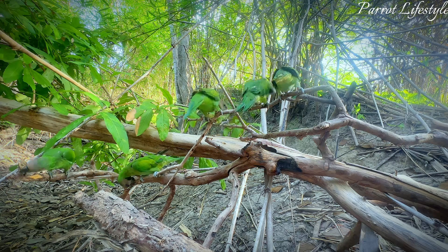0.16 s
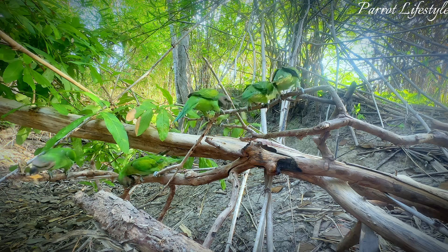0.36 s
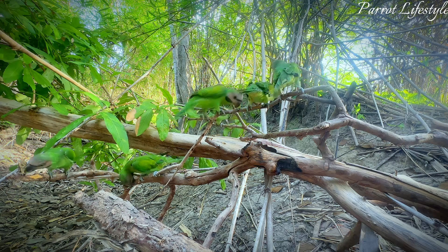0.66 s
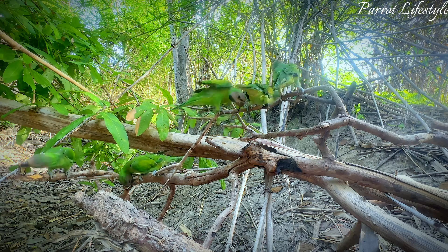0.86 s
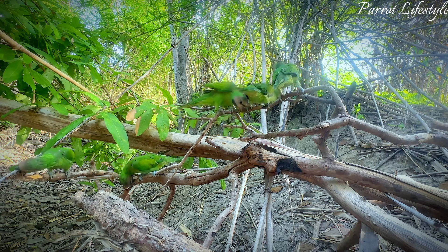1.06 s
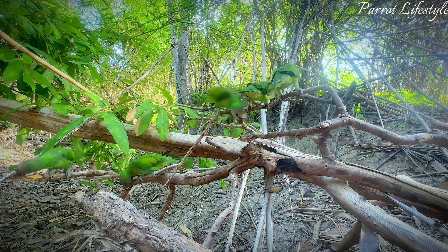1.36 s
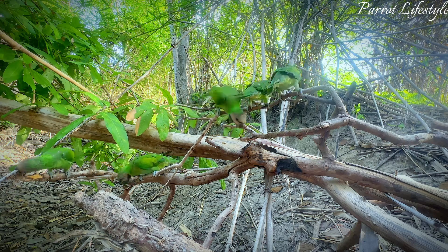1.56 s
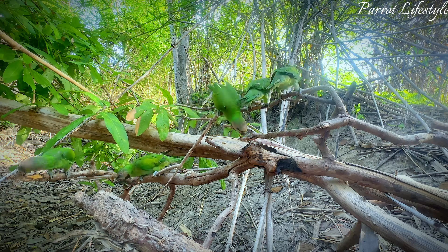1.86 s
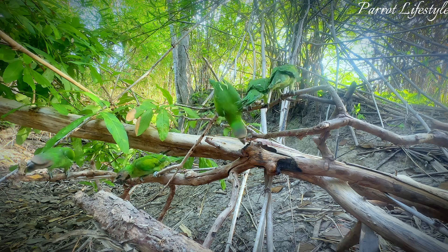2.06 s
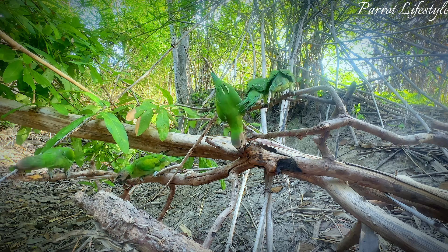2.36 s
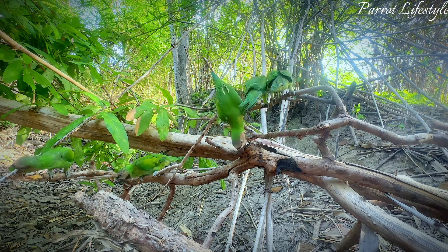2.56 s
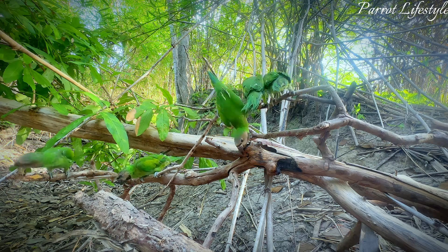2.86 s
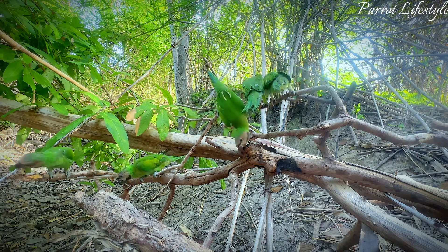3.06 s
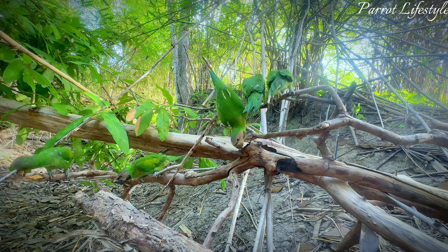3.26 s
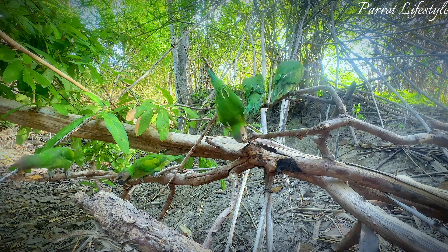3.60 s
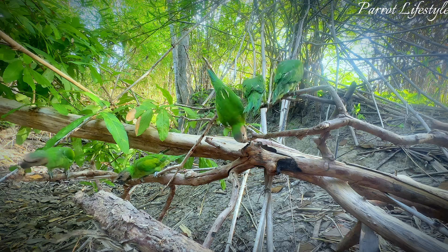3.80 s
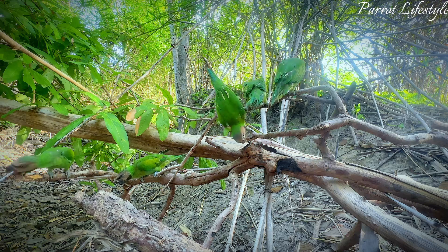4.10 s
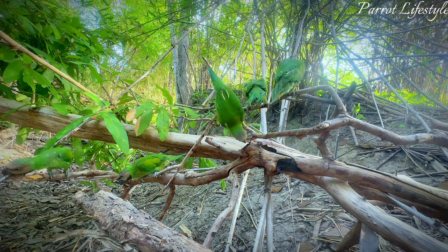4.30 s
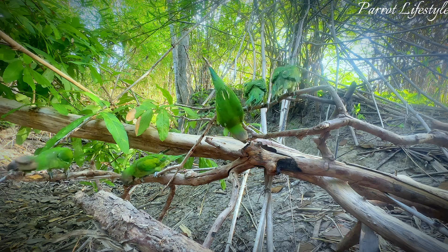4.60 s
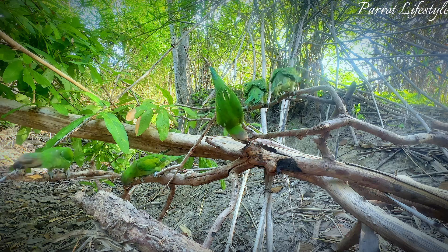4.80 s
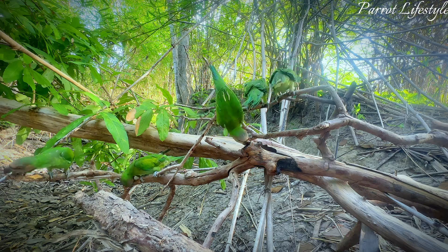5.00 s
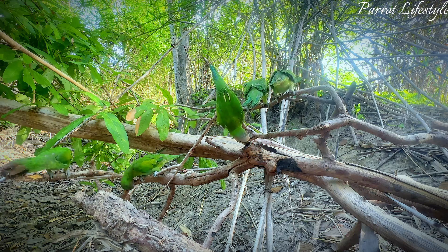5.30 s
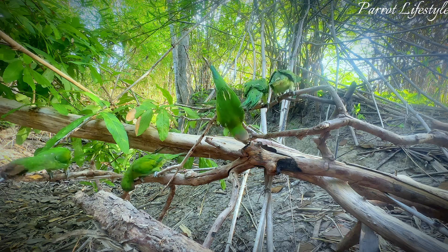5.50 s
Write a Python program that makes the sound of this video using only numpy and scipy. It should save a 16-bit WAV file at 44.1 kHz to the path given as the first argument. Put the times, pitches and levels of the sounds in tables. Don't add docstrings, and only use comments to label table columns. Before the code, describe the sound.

Small parrots tap and scratch on dry branches in a thicket, over a steady high cricket trill and a faint low rumble.

```python
import sys
import numpy as np
from scipy import signal
from scipy.io import wavfile
from scipy.ndimage import uniform_filter1d

SR = 44100
rng = np.random.default_rng(int(sys.argv[2]) if len(sys.argv) > 2 else 0)


def unload_audio(sound):
    columns = np.transpose(np.atleast_2d(sound))
    steps = np.round(np.clip(columns, -1, 1) * 32767)
    wavfile.write(sys.argv[1], SR, steps.astype(np.int16))


def attenuation_scalar(level_db):
    decades = np.asarray(level_db, float) / 20
    return 10 ** decades


N = 249165

# (multiple of tooth rate, level [dB])
TEETH = [(4, -26.5), (6, -30), (7, -32.5), (8, -36), (10, -35)]


def evened(x):
    return x / np.sqrt(np.mean(x ** 2) + 1e-20)


def band(x, lo_hz, hi_hz):
    return signal.sosfilt(signal.butter(2, [lo_hz, hi_hz], "bandpass", fs=SR, output="sos"), x)


def ring(x, hz, width_hz):
    pole = np.exp((2j * np.pi * hz - np.pi * width_hz) / SR)
    return 2 * signal.lfilter([1 - abs(pole)], [1, -pole], x).real


def track(events, sound):
    mix = np.zeros(N)
    for s, *row in events:
        part = mix[round(s * SR):]
        made = sound(*row)[:len(part)]
        part[:len(made)] += made
    return mix


def thicket(x, t60_s, wet_db):
    t = np.arange(SR // 4) / SR
    tail = rng.standard_normal(len(t)) * attenuation_scalar(-60 * t / t60_s) * (t > .003)
    return x + attenuation_scalar(wet_db) * signal.oaconvolve(x, tail / np.linalg.norm(tail))[:N]


def hush():
    # (frequency [Hz], level per Hz [dB])
    colour = [(40, -3.5), (70, 7.5), (150, -2), (850, -13), (2800, -13.5), (5000, -14), (6300, -21),
              (7000, -21.5), (8000, -74), (9600, -36), (10250, -15), (11000, -42.5), (13500, -27),
              (15000, -25)]
    frames, hz = N // 256 + 5, np.fft.rfftfreq(1024, 1 / SR)
    a, b, patches = rng.standard_normal((frames, 513, 3)).T
    patches = uniform_filter1d(patches, size=10, axis=0)
    patches = evened(uniform_filter1d(patches, size=8, axis=1))
    colour_hz, level_db = np.transpose(colour)
    colour_db = np.interp(np.log(hz + 1), np.log(colour_hz), level_db)
    patchy_db = 0.38 + 2.0 / (1 + (hz / 500) ** 2)
    z = (a + 1j * b) * attenuation_scalar(colour_db[:, None] + patchy_db[:, None] * patches)
    return attenuation_scalar(-55.5) * evened(signal.istft(z, nperseg=1024, noverlap=768)[1][:N])


def cricket(hz, db, turns, share, rise_hz, side_db, teeth=TEETH, uneven_db=0.5, uneven_hz=2.785):
    turns = turns + 1.5
    start, loud, pitch = rng.standard_normal((100, 3))[turns.astype(int)].T
    place = np.clip((turns % 1 - .5) / np.clip(share, .1, 1), -.5, .5)
    swell = np.cos(np.pi * place) ** 1.1 * attenuation_scalar(uneven_db * loud)
    swell *= 1 + .1 * evened(uniform_filter1d(rng.standard_normal(N), size=150))
    pitch_hz = hz + 2 * rise_hz * place + uneven_hz * pitch
    phase = 2 * np.pi * np.cumsum(pitch_hz) / SR + 9 * start
    sides = sum(attenuation_scalar(tooth_db + side_db) * np.sin(k * phase / 5) for k, tooth_db in teeth)
    return attenuation_scalar(db) * evened(swell) * np.sqrt(2) * (np.sin(phase) + sides)


def singer(t, row, pace):
    hz, hz_per_s, db, db_per_s, rate_hz = row
    lag, lag_per_s, sway, period_s, late_s = pace
    swayed = sway * np.cos(2 * np.pi * (t - late_s) / period_s)
    turns = rate_hz * t - lag - lag_per_s * t - swayed
    return hz + hz_per_s * t, db + db_per_s * t, turns


def near_crickets():
    # (wing pitch [Hz], pitch drift [Hz/s], level [dB], level drift [dB/s], stroke rate [1/s])
    singers = [(7177, -.3, -50.2, -.33, 14.46), (7275.5, -.25, -54, .3, 14.42),
               (7382, -1.7, -47.7, .13, 12.98), (7537, -2.8, -51.5, -.04, 12.96),
               (7290, -.7, -62, 0, 14.45)]
    # (mean lag [turns], lag drift [turns/s], sway [turns], sway period [s], latest at [s])
    paces = [(.19, 0, .07, 3.6, 2.1), (-.37, .005, .08, 1.9, 2.0), (-.25, .014, .045, 3, 2.4),
             (.25, 0, .06, 2.9, 2.5), (.5, -.03, .06, 4.5, 1.8)]
    # (sounding share of turn, pitch rise in a stroke [Hz], trim [dB], side tones [dB])
    wings = [(0.99, 14, 1, 2), (0.27, 5.5, -5, 7.5), (0.64, 24.5, -0.34, -31), (0.58, 23, -1.5, -23)]
    # (multiple of tooth rate, level [dB])
    reedy_teeth = [(4, -7.5), (6, -28), (7, -9.5), (8, -27.5), (10, -19)]
    t, mix = np.arange(N) / SR, 0
    for row, pace, (share, rise_hz, trim_db, side_db) in zip(singers, paces, wings):
        mix += attenuation_scalar(trim_db) * cricket(*singer(t, row, pace), share, rise_hz, side_db)
    mix += attenuation_scalar(-5.0) * cricket(*singer(t, singers[-1], paces[-1]), 0.45, 2.5, 0, reedy_teeth)
    return thicket(mix, .1, -15)


def far_crickets():
    # (pitch [Hz], stroke rate [1/s])
    voices = [(7110, 13.5), (7150, 12.4), (7232, 11.9), (7252, 14.1), (7275, 13.2), (7310, 13.7),
              (7415, 13.05), (7440, 12.5), (7485, 14.7), (7505, 13.9), (7590, 13.3)]
    voices_db = [-92, -61, -63, -58, -57.5, -57, -62.5, -62, -67, -57.5, -89]
    t, mix = np.arange(N) / SR, 0
    for (hz, rate_hz), db in zip(voices, voices_db):
        mix += cricket(hz + 0 * t, db, rate_hz * t, .9, 6, 1.5, uneven_db=2.5, uneven_hz=6)
    return mix


def tap(db, hz, body_db, treble_db, split_db):
    t = np.arange(2000) / SR
    rattle = rng.standard_normal(len(t)) * attenuation_scalar(-60 * t / .009) * np.minimum(t / .0004, 1)
    rattle[8] += 4.5
    width_hz = .06 * hz + 120
    wood = rattle + attenuation_scalar(13) * ring(rattle, hz, width_hz) + attenuation_scalar(2) * ring(rattle, .79 * hz, width_hz)
    edge_hz = np.clip(.72 * hz, 2400, 3600)
    crack = rattle * attenuation_scalar(-60 * t / .02)
    body = -band(wood if hz < edge_hz else rattle, min(.6 * hz, 1300), edge_hz)
    middle = band(band(wood, edge_hz, 5900), edge_hz - 1800, 6200)
    treble = band(band(crack, 7000, 11500), 6000, 13000)
    air = band(crack, 12000, 16500)
    treble_split_db, air_split_db = split_db
    parts = [(body_db, body), (0, middle), (treble_db + treble_split_db, treble), (treble_db + air_split_db, air)]
    return attenuation_scalar(db) * sum(attenuation_scalar(part_db) * part / abs(part).max() for part_db, part in parts)


def beak_pecks():
    # (time [s], level [dB], ring [Hz], body [dB], treble [dB])
    pecks = [(.491, -42.5, 915, -5, -5), (.553, -54, 1540, 10, -5), (1.0189, -37.5, 4740, -5, -5),
             (1.9173, -47.5, 5190, -1, -4), (2.046, -44, 4130, -21, 10), (2.599, -47, 5070, -20, 7),
             (3.0365, -48, 5150, -15, 1), (3.0659, -39.5, 3770, -28, 2), (3.1322, -27, 5100, -10, 2.5),
             (3.1455, -27, 5040, -9.5, -3), (3.3603, -37.5, 4970, -6, 7.5), (4.2995, -43, 4070, -17, 0),
             (4.9248, -22.5, 2560, -33, -11.5), (5.067, -38, 5160, -5.5, -7), (5.1954, -30, 5040, -23, 0),
             (5.3773, -25.5, 3860, -7, -13), (5.45, -53, 5080, -5, 8.5)]
    return track(pecks, lambda *row: tap(*row, split_db=(0.1, -9)))


def footfalls():
    # (time [s], level [dB], ring [Hz], body [dB], treble [dB])
    landings = [(.833, -31, 4880, -0.5, 1), (.9722, -49, 2430, 1, 5), (.9906, -29, 1910, -4, 0),
                (.993, -51, 900, 12, -20), (1.3335, -60.5, 972, 10, -14), (1.3738, -40, 1670, -23, -22),
                (1.496, -38.5, 5000, -21, -29), (1.6701, -47, 5070, -10, -22),
                (2.2253, -49, 1960, -10, -19), (2.4389, -51, 5140, -6, -17), (2.7944, -58.5, 940, 13, -19),
                (3.1023, -41.5, 3800, -20, -1), (3.1419, -24, 4800, -39, -7), (3.3248, -42, 5300, -30, -6),
                (4.1629, -33, 4480, -31, -30), (4.165, -55, 1110, 15, -25), (4.3062, -39.5, 4120, 0, -20),
                (4.3145, -43, 4100, -8, -20), (4.4082, -43.5, 1580, -7, -19), (5.2997, -40, 2930, -20, -22),
                (5.3532, -51, 2300, 7, -24), (5.3968, -33.5, 5100, -2.5, -30),
                (5.5273, -38, 4300, -30, -30)]
    return track(landings, lambda *row: tap(*row, split_db=(0.092, -0.1)))


def knock(db, first_hz, last_hz, length_s):
    t = np.arange(1, round(2 * length_s * SR)) / SR
    pitch_hz = last_hz + 1.1 / (t + 1.1 / first_hz)
    return attenuation_scalar(db) * np.sin(2 * np.pi * np.cumsum(pitch_hz) / SR) * np.exp(-(t / length_s) ** 2)


def log_knocks():
    # (time [s], level [dB], first pitch [Hz], last pitch [Hz], length [s])
    knocks = [
        (.985, -51, 300, 90, .025),
        (1.785, -41, 1800, 75, .02),
        (4.257, -48, 450, 75, .03),
        (4.42, -48, 300, 62, .035),
        (4.995, -45, 250, 50, .04),
    ]
    return track(knocks, knock)


def claw_snaps():
    # (time [s], level [dB], ring [Hz], body [dB], treble [dB])
    snaps = [(1.0286, -36, 3680, -25, -10), (1.1425, -58, 1650, 9, 9), (1.1813, -27, 1310, -10, -12),
             (1.4242, -43.5, 4900, -16, 4), (1.7604, -57, 4800, -6, 14), (1.8532, -55, 4620, -9, 8),
             (3.0755, -61, 4500, -9, 10), (1.9619, -47.5, 3040, -20, 7), (2.467, -50, 3220, -3, 5),
             (2.5014, -38.5, 1180, -4.5, 2), (2.6218, -49, 2720, -16, 16), (2.7014, -53, 1480, 13, 9),
             (4.0081, -30.5, 4650, -8, -10), (4.343, -40, 5200, 1.5, -8), (4.5394, -51, 4650, -9, 2),
             (5.1994, -28.5, 4050, 3, 3)]
    return track(snaps, lambda *row: tap(*row, split_db=(-13, 0.1)))


def chirp(length_s, start_hz, end_hz, db):
    noise = uniform_filter1d(rng.standard_normal((2, SR // 4)), size=200, axis=1)
    waver, flutter = evened(noise)[:, :round(length_s * SR)]
    pitch_hz = np.linspace(start_hz, end_hz, len(waver)) + 45 * waver
    return attenuation_scalar(db + 4 * flutter) * np.sin(2 * np.pi * np.cumsum(pitch_hz) / SR) * np.hanning(len(waver))


def far_chirps():
    # (time [s], length [s], start [Hz], end [Hz], level [dB])
    chirps = [
        (2.805, 0.035, 2730, 2720, -59.5),
        (3.38, 0.041, 2950, 2980, -60),
        (4.04, 0.019, 2740, 2770, -59),
        (4.645, 0.026, 2940, 2885, -55.5),
        (4.805, 0.02, 2800, 2680, -60.5),
        (4.84, 0.046, 2620, 2560, -71),
        (5.04, 0.032, 2690, 2700, -54),
        (5.23, 0.047, 2590, 2610, -65),
    ]
    return thicket(track(chirps, chirp), 0.4, -0.93)


def scuff(length_s, hz, width_hz, db):
    noise, grit = rng.standard_normal((2, SR // 4))[:, :round(length_s * SR)]
    scrape = ring(noise * attenuation_scalar(2.5 * evened(uniform_filter1d(grit, 150))), hz, width_hz)
    return attenuation_scalar(db) * evened(scrape) * np.hanning(len(scrape))


def foot_scuffs():
    # (time [s], length [s], centre [Hz], width [Hz], level [dB])
    scuffs = [
        (3.15, 0.11, 1500, 1300, -56.5),
        (4.024, .3, 990, 600, -64.5),
        (4.738, 0.19, 2540, 350, -65),
        (5.435, 0.065, 2222, 648.1, -64),
        (5.541, 0.03, 460, 380, -56.5),
    ]
    return track(scuffs, scuff)


def scene():
    insects = near_crickets() + far_crickets()
    birds = thicket(beak_pecks() + footfalls() + claw_snaps() + foot_scuffs(), .025, -12)
    return (hush() + insects + birds + log_knocks() + far_chirps())[None]


def low_pass(x):
    return signal.sosfilt(signal.butter(12, 15750, fs=SR, output="sos"), x)


def record(dry):
    cut = signal.sosfilt(signal.butter(4, 48, "highpass", fs=SR, output="sos"), dry)
    return low_pass(cut)


dry = scene()
out = record(dry)
unload_audio(out)
```